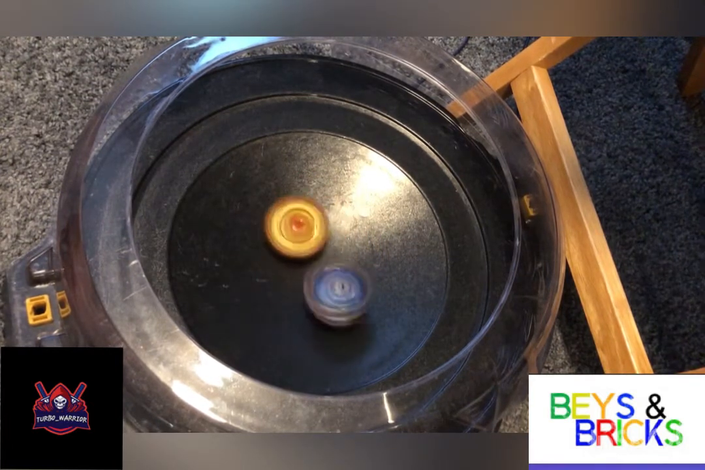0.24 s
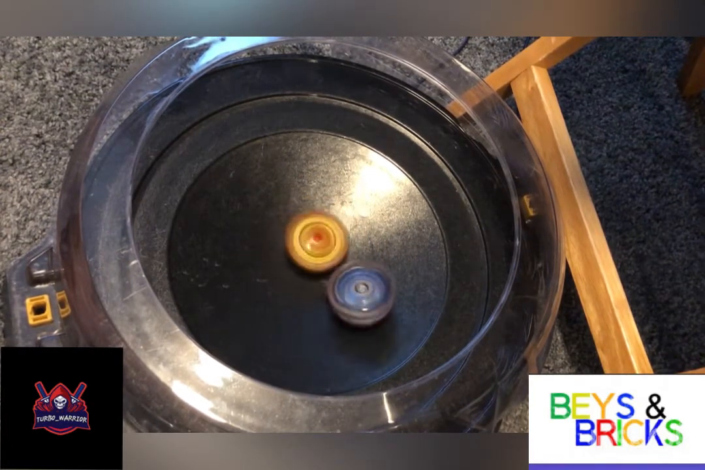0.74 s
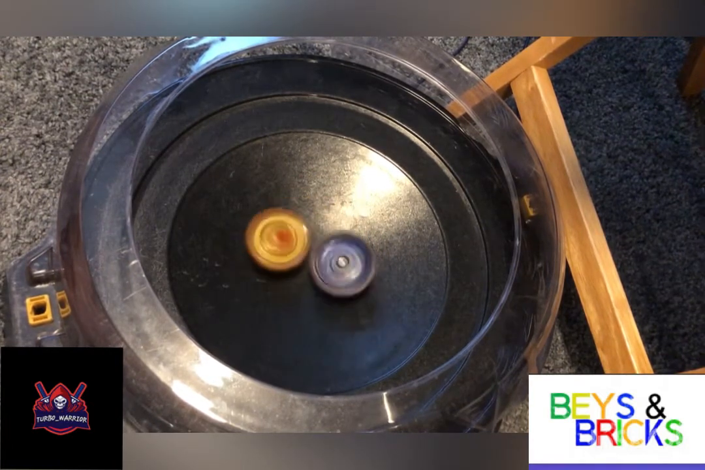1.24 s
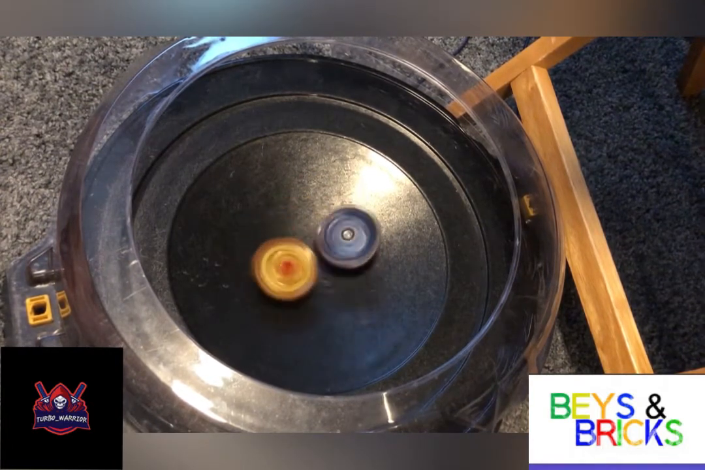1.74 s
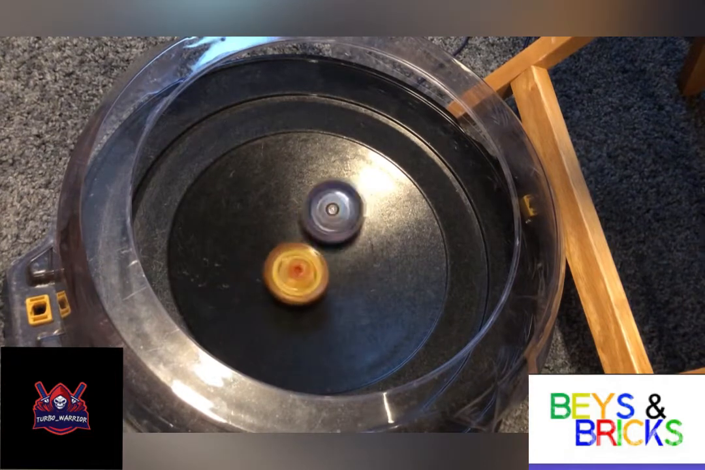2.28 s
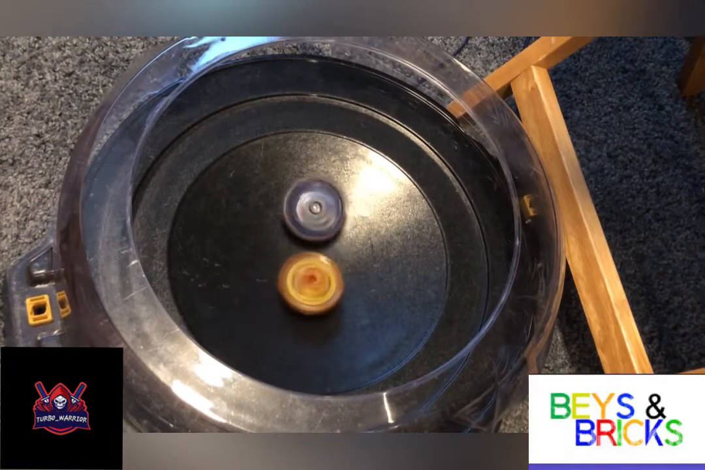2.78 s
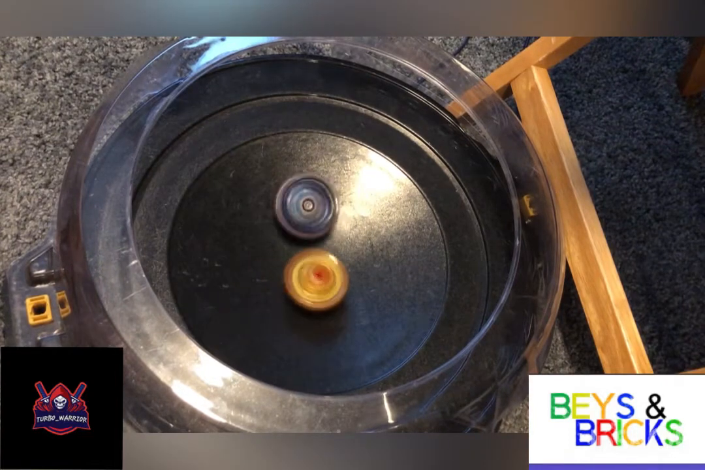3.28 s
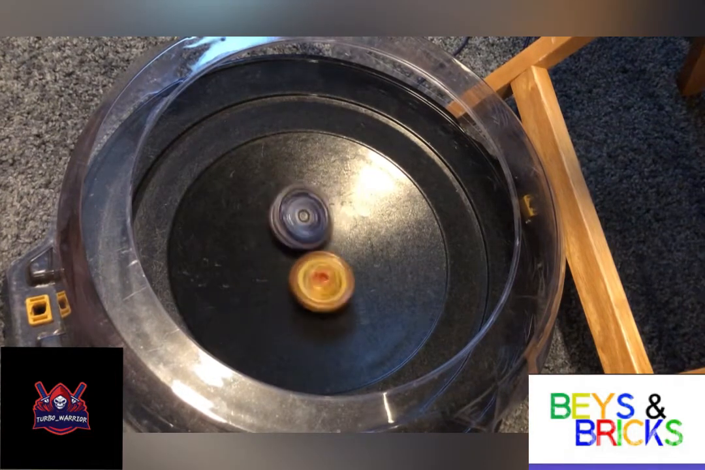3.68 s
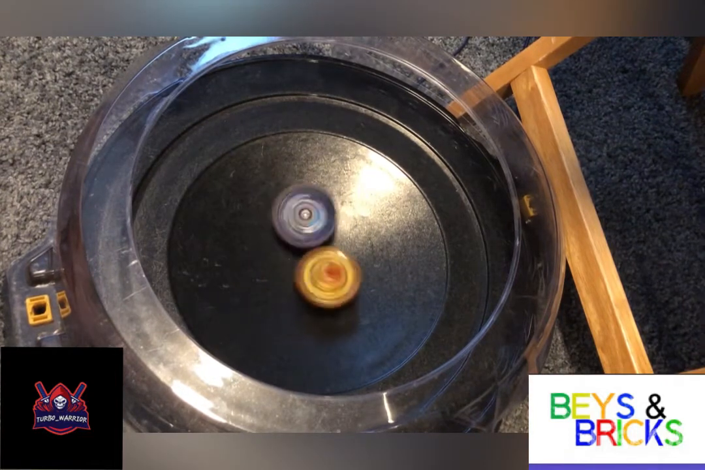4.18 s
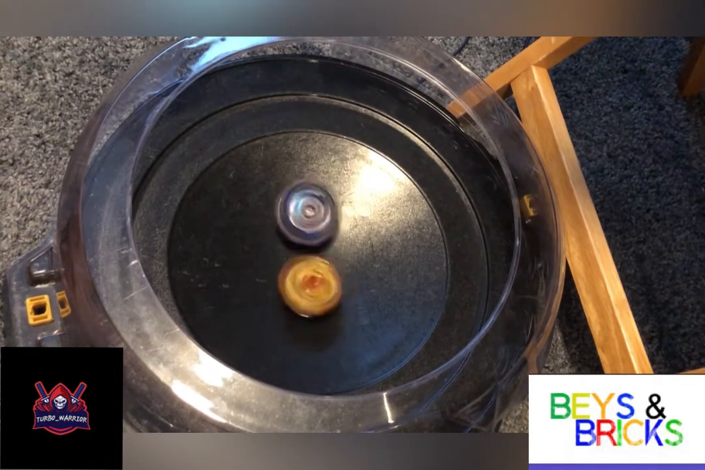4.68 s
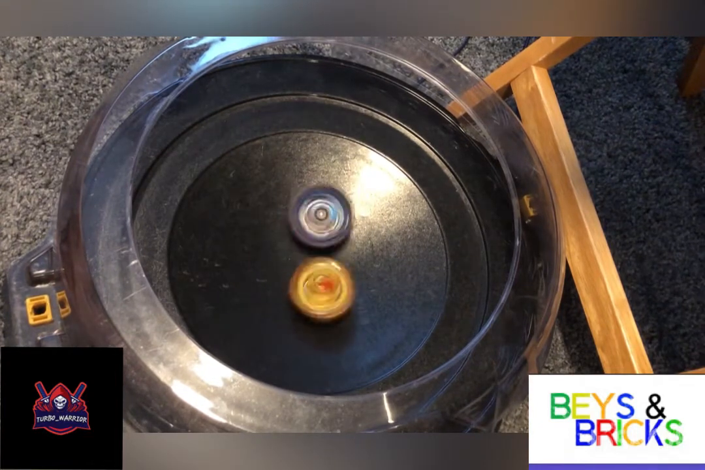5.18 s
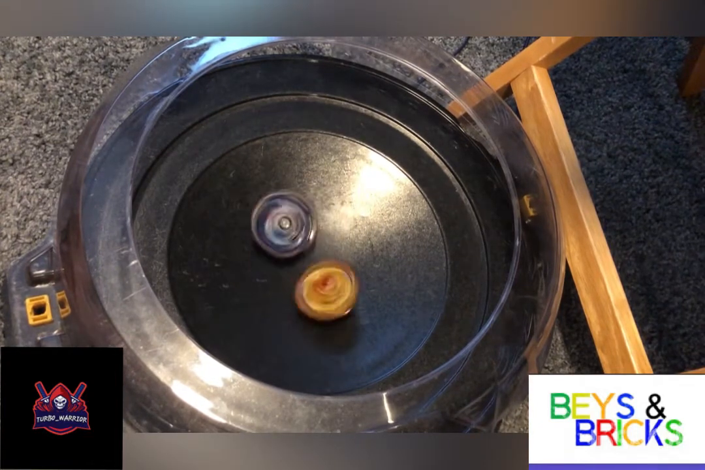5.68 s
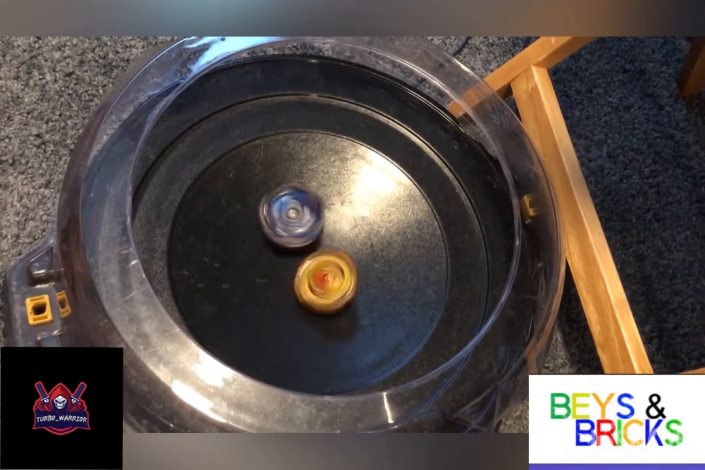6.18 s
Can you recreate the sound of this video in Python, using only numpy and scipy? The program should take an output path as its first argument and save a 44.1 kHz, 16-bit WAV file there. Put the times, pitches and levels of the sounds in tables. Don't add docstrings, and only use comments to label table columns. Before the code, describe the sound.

Close to a small microphone, two toy tops spin in a thin plastic bowl on carpet. Sharp, toothy clacks come irregularly, several a second, with quick faint ticking runs between them early on. Some hits leave a thin metallic ring. Later the knocks grow softer and more hollow, with small scrapes from the tips, over a low faint drumming and grinding.

```python
import sys
import numpy as np
from scipy import signal
from scipy.fft import rfft, irfft
from scipy.io import wavfile
from scipy.ndimage import uniform_filter1d

SR = 44100
rng = np.random.default_rng(int(sys.argv[2]) if len(sys.argv) > 2 else 0)


def persist_wave(psi):
    counts = np.round(np.clip(psi, -1, 1) * 32767).astype(np.int16)
    wavfile.write(sys.argv[1], SR, np.atleast_2d(counts).T)


def voltage_ratio(decibels):
    exponent = np.asarray(decibels, float) / 20
    return 10 ** exponent


N = 283561


def evened(x):
    return x / np.sqrt(np.mean(x ** 2) + 1e-20)


def read(points, hz):
    f, value = np.transpose(points)
    return np.interp(np.log(hz + 1), np.log(f + 1), value)


def add(mix, s, sound):
    part = mix[..., round(s * SR):][..., :sound.shape[-1]]
    part += sound[..., :part.shape[-1]]


def coloured(spectrum):
    gain = voltage_ratio(read(spectrum, np.fft.rfftfreq(N, 1 / SR)))
    return evened(irfft(rfft(rng.standard_normal(N)) * gain, N))


def modes(table, size=8192, order=-1):
    hz, width, db = np.transpose(table)[:, :, None]
    t = np.arange(size) / SR
    sign = order ** np.arange(len(table))[:, None]
    decay = np.sqrt(width) * np.exp(-np.pi * width * t)
    return rfft(sign * voltage_ratio(db) * decay * np.sin(2 * np.pi * hz * t))


def shaken(x, table):
    return evened(signal.oaconvolve(x, irfft(modes(table).sum(0)))[:N])


# t/s, grinding/dB, drumming/dB
TIPS = [(0.0, -54.5, -48.5), (1.16, -60.5, -48), (1.32, -58, -52), (1.48, -68, -50.5), (1.72, -49.5, -47),
        (3.53, -53, -52), (3.94, -62, -50), (4.15, -48, -54), (4.46, -48, -53.5), (4.71, -54, -51.5),
        (5.53, -47, -54.5), (5.71, -49, -46.5), (6.07, -52, -47), (6.43, -47.5, -50)]
# f/Hz, density/dB per Hz
GRIND = [(71, -61), (120, -11.5), (195, -39), (256, 7), (433, 1.5), (632, -5.5), (1300, -8.5), (1770, -23),
         (2780, -19.5), (3160, -33), (4290, -18), (5530, -25), (9000, -29.5), (11700, -42), (19800, -120)]
# f/Hz, width/Hz, level/dB
DRUM = [(47, 17, -59), (64.6, 21, 0), (86, 40, -1.5)]
GRIT_PER_S, GRIT_DB = 420, -6.5


def tips():
    s, grind_db, drum_db = np.transpose(TIPS)
    t = np.arange(N) / SR
    lumps = uniform_filter1d(uniform_filter1d(rng.standard_normal(N), 300), 300)
    lumps_db = 2 * evened(lumps)
    speck_db = 6.5 * np.minimum(rng.exponential(1, N), 2)
    specks = rng.standard_normal(N) * voltage_ratio(speck_db) * (rng.random(N) < GRIT_PER_S / SR)
    grit = shaken(specks, THUMP[2:] + KNOCK)
    grind = coloured(GRIND) * voltage_ratio(lumps_db) + voltage_ratio(GRIT_DB) * grit
    drum = shaken(rng.standard_normal(N), DRUM)
    return grind * voltage_ratio(np.interp(t, s, grind_db) - 1.0) + drum * voltage_ratio(np.interp(t, s, drum_db) + 4.0)


# f/Hz, density/dB per Hz
HISS = [(880, -37), (1500, -4), (1780, -16.5), (2800, -3), (3180, -22.5), (8400, 1), (16000, 5)]


def hiss():
    return voltage_ratio(-78) * coloured(HISS)


def soft_knock_db(db):
    return -0.41 * (db + 41.5)


# first t/s, last t/s
RUNS = [(.0014, .136), (.1815, .1815), (.3614, .406), (.6394, .6866), (.736, .736), (.8394, .8902),
        (.9378, .9892), (1.0405, 1.0914), (1.3588, 1.4633), (1.9596, 2.0755), (2.5338, 2.604),
        (2.5576, 2.6228), (3.121, 3.2825), (3.153, 3.2291), (3.5269, 3.6102)]
# clack level/dB, thump re clack/dB
RUN_DB = [(-39.5, -21), (-43.5, -8), (-37.5, -11), (-42.5, -18), (-46, -26), (-41.5, -6), (-35, -15),
          (-38, -8), (-44.5, -3), (-34, -7), (-47.5, -6), (-32.5, -9.5), (-42.5, -4), (-34, -8),
          (-35.5, -8.5)]


def runs():
    rows = []
    for (first, last), (run_db, thump_db) in zip(RUNS, RUN_DB):
        turn_s = .044 + .009 * first
        for s in np.linspace(first, last, 1 + round((last - first) / turn_s)):
            db = run_db - 1.9 * rng.standard_normal()
            rows.append((s, db, thump_db, soft_knock_db(db), -18, 130 + 170 * s))
    return rows


# t/s, clack level/dB, thump re clack/dB, tick re clack/dB, favoured bowl f/Hz
CLASHES = [(0.2041, -14.5, -9.5, -7.5, 244), (0.4443, -23.5, -2, -7, 250), (0.451, -17, -6.5, -8, 400),
           (0.5738, -14.5, -8.5, -11, 157), (0.7766, -17, -6, -6.5, 327), (1.1314, -16, -4, -8, 269),
           (1.2388, -20, -3.5, -5.5, 372), (1.6578, -21.5, 0, -3.5, 270), (1.7778, -20.5, -2, -5.5, 422),
           (2.135, -17.5, -11.5, -8.5, 300), (2.1853, -20, -6.5, -14.5, 161), (2.421, -19.5, -2, -6.5, 169),
           (2.6709, -20.5, -1.5, -6.5, 230), (2.8658, -19, -1.5, -8, 180), (3.0191, -23.5, -4.5, -6.5, 273),
           (3.3794, -23, -6, -8.5, 170), (3.6703, -23.5, -5.5, -11, 160), (3.9068, -20.5, -7.5, -2.5, 255),
           (4.1764, -20, -6, -13.5, 260), (4.5183, -19.5, -3.5, -4.5, 440), (4.7441, -23, -4.5, -9.5, 428),
           (4.9744, -20, -7.5, -11.5, 413), (5.1077, -22, -3.5, -8.5, 186), (5.2771, -21, -2.5, -6, 467)]


def clashes():
    return [(s, db, thump_db, -8 + 0.69 * s, tick_db, hz) for s, db, thump_db, tick_db, hz in CLASHES]


# t/s, clack level/dB, tick re clack/dB, favoured bowl f/Hz
GLANCES = [(0.5444, -24, -11, 124), (1.2084, -29.5, -7.5, 160), (1.4929, -32.5, -14, 207),
           (1.504, -24, -6.5, 240), (1.5274, -25.5, -5, 249), (2.172, -30, -2.5, 196),
           (2.3642, -24.5, -10.5, 170), (2.6631, -28, -15, 139), (2.9466, -23.5, -8.5, 164),
           (3.0071, -26.5, -5, 250), (3.3072, -24.5, -9.5, 167), (3.332, -29.5, -9.5, 417),
           (3.445, -30, -8.5, 256), (3.455, -26.5, -7.5, 269), (3.7167, -26, -7, 420),
           (4.0923, -25.5, -4.5, 258), (4.1565, -33.5, -12, 275), (4.5067, -29, -11, 256),
           (4.851, -31.5, -14, 296), (4.8653, -25.5, -7.5, 400), (5.449, -25.5, -7.5, 158),
           (5.5152, -32.5, -11, 439), (5.5691, -28, -5, 440), (5.812, -36, -8, 261),
           (5.8723, -35, -9.5, 175), (5.979, -35, -11, 225), (6.097, -30, -9.5, 159),
           (6.3272, -30, -9.5, 387), (6.3823, -35.5, -9, 136)]


def glances():
    return [(s, db, -5 + 0.68 * s, -9.5 + 1.61 * s, tick_db, hz) for s, db, tick_db, hz in GLANCES]


# t/s, clack level/dB, thump re clack/dB,
# favoured bowl f/Hz
GRAZES = [(1.105, -36.5, -1, 266), (1.5704, -54, 4, 374), (2.2876, -39, -2, 468), (2.3082, -31.5, -17, 250),
          (2.79, -41.5, 0, 256), (2.819, -36.5, -12, 310), (3.5763, -41, -3, 264), (3.84, -43, -4, 380),
          (3.9651, -42, -4, 261), (4.0592, -45.5, 5, 263), (4.2185, -36.5, -3.5, 256),
          (4.2386, -47, -9, 250), (4.294, -42.5, -18, 145), (4.3369, -39.5, -5, 441),
          (4.3944, -39.5, 0, 431), (4.451, -39, 2, 417), (1.8987, -46.5, 8.5, 409),
          (4.6637, -44.5, -4, 318), (4.725, -35, -4.5, 200), (5.0928, -43.5, 3, 249),
          (5.2185, -47.5, 2, 398), (5.4086, -37.5, 3, 430), (5.7028, -52, 2, 256), (5.7213, -44.5, -5, 283),
          (5.7912, -47.5, 9, 425), (5.9674, -41.5, 7.5, 352), (6.205, -47.5, 5.5, 260)]


def grazes():
    return [(s, db, thump_db, soft_knock_db(db), -14.5, hz) for s, db, thump_db, hz in GRAZES]


def chatter():
    teeth = rng.standard_normal(5000) * voltage_ratio(4.0 * np.minimum(rng.exponential(1, 5000), 4))
    teeth[150] += 9
    teeth[140:164] += 3.3 * np.hanning(24)
    onset = 1 - np.exp(-np.arange(5000) / SR / 0.0026)
    return teeth * onset


def strike(bank, force, db, ms, favour_db=0, rattle_db=-21):
    t_ms = np.arange(len(force)) / SR * 1000
    rattle = voltage_ratio(rattle_db) * np.exp(-t_ms / 24.6)
    dying = force * (np.exp(-t_ms / ms) + rattle)
    spot = voltage_ratio(2 * rng.standard_normal(len(bank)) + favour_db)
    sound = irfft(rfft(dying, 8192) * (spot @ bank))
    return voltage_ratio(db) * sound / np.linalg.norm(sound) * 15


# f/Hz, width/Hz, level/dB
THUMP = [(120, 34, -15.5), (169, 82, 1), (255, 30.5, 0), (318, 41, -4.5), (421.5, 76, 4), (528, 65, -7)]


def near(hz):
    return -2.5 * np.log2(np.transpose(THUMP)[0] / hz) ** 2


# f/Hz, width/Hz, level/dB
KNOCK = [(712, 156, 6.8), (1011.5, 52, 8.5), (1254, 145, 13.26), (1581, 120, 7.4)]
# f/Hz, width/Hz, level/dB
CLACK = [(1970, 180, -7.5), (2338, 160, -3), (2752, 240, 3), (3645, 660, 2), (4052, 500, -3),
         (4028, 280, 5), (4670, 400, 1.5)]
# f/Hz, width/Hz, level/dB
TICK = [(5556, 2340, -4), (6920, 1200, -0.5), (8320, 630, -3), (9600, 580, -5), (10720, 3300, -6.5),
        (12930, 1000, -7), (13900, 2200, -9)]


def blows():
    out = np.zeros(N)
    thump, knock, clack, tick = modes(THUMP, order=1), modes(KNOCK), modes(CLACK), modes(TICK)
    high_shell = np.transpose(CLACK)[0] > 2950
    for s, db, thump_db, knock_db, tick_db, hz in runs() + clashes() + glances() + grazes():
        force = chatter()
        soft = db < -30 and tick_db < -13
        short = .75 if soft else 1
        bowl = strike(thump, force, db + thump_db + 3.5, 1.37, near(hz), rattle_db=-12.5)
        bowl += strike(knock, force, db + knock_db - 3.5, 15.7)
        dull_db = (0.46 * min(tick_db - 2.0, 0) - 3 * soft) * high_shell
        tops = strike(clack, force, db - 7.0, 7.1 * short, dull_db)
        tops += strike(tick, force, db + tick_db - 2.0, 9.2 * short)
        add(out, max(s - .0025, 0), bowl + tops)
    return out


# f/Hz, t60/s
ROOM = [(100, 0.33), (300, 0.1), (1800, 0.22), (4800, 0.26), (9000, 0.18), (14000, 0.14)]
# f/Hz, level/dB
WET = [(150, -4.5), (500, -5.5), (2500, -1.5), (6000, -1), (14000, 6)]


def room(x):
    taps, at = np.zeros((3, SR // 2)), np.arange(150, SR // 2 - 20, 20)
    at = at + rng.integers(0, 20, (3, len(at)))
    np.put_along_axis(taps, at, rng.choice([-1., 1.], at.shape), 1)
    hz, t, z = signal.stft(taps, SR, nperseg=256)
    fade_db = read(WET, hz)[:, None] - 60 * t / read(ROOM, hz)[:, None]
    tails = signal.istft(z * voltage_ratio(fade_db), SR, nperseg=256)[1]
    phase = 1.7 * np.arange(N) / SR + np.arange(3)[:, None] / 3
    turn = np.cos(2 * np.pi * phase) * np.sqrt(2 / 3)
    return signal.fftconvolve(x * turn, tails / 12.74, axes=1)[:, :N].sum(0)


DISC_HZ = [4350, 4480, 5430, 5940, 6620, 8490, 9740, 10540, 10985, 12025, 12250]
DISC_T60 = [.27, 1.15, .45, .57, .25, .11, .26, .35, .21, .27, .21]
# t/s, level/dB
RINGS = [
    [(4.975, -62)],
    [(.777, -53), (1.239, -52), (1.505, -65), (2.865, -48), (3.008, -65), (4.175, -57.5), (4.518, -48.5),
     (4.744, -64), (3.717, -60)],
    [(5.108, -54)],
    [(.777, -54)],
    [(1.505, -47), (2.673, -50), (3.38, -45), (3.907, -46), (5.571, -54), (6.097, -53)],
    [(1.239, -25), (2.421, -26.5)],
    [(4.175, -49), (4.976, -50)],
    [(.574, -55), (4.175, -54), (4.518, -43)],
    [(.777, -40)],
    [(2.673, -54), (4.518, -58), (4.976, -54)],
    [(3.907, -51)],
]


def discs():
    out, t = np.zeros(N), np.arange(SR // 2) / SR
    for hz, t60, rings in zip(DISC_HZ, DISC_T60, RINGS):
        for s, db in rings:
            flutter = 1 + 0.4 * np.sin(2 * np.pi * (38 * t + rng.random()))
            add(out, s, voltage_ratio(db - 60 * t / t60) * flutter * np.sin(2 * np.pi * hz * (t + s)))
    return out


# t/s, thump level/dB, knock re thump/dB, favoured bowl f/Hz
SKIPS = [(1.037, -52, 5, 152), (1.093, -39.5, -6, 280), (1.266, -38, -10, 122.3), (1.289, -47.5, 7, 132),
         (1.62, -45, -1, 420), (1.884, -45.5, 7.5, 300), (2.028, -39.5, -4, 300), (4.458, -40.5, -2, 431),
         (5.47, -27, -16, 245), (5.626, -40.5, -3, 164), (5.719, -44, 1, 240), (5.761, -35.5, -23, 447),
         (5.785, -30, -20, 400), (5.828, -44, 1, 250), (5.884, -33.5, -6, 194), (6.117, -40.5, -1, 149),
         (6.294, -38.5, -2.5, 409), (6.349, -33.5, -4, 417), (6.4, -33, -4, 148)]


def skips():
    out = np.zeros(N)
    thump, knock = modes(THUMP, order=1), modes(KNOCK)
    for s, db, knock_db, hz in SKIPS:
        force = chatter()
        low = strike(thump, force, db + 2.5, 2.2, near(hz))
        high = strike(knock, force, db + knock_db - 0.5, 6)
        add(out, s - .003, low + high)
    return out


def contacts():
    return signal.lfilter(*signal.butter(2, 106.5, "high", fs=SR), blows() + skips())


def scene():
    knocks = contacts()
    return (knocks + room(knocks) + discs() + tips() + hiss())[None]


def low_pass(x):
    return signal.sosfilt(signal.butter(12, 16830, fs=SR, output="sos"), x)


def record(dry):
    edge = signal.firwin(255, 15900, window=("kaiser", 4), fs=SR)
    return low_pass(signal.oaconvolve(dry, edge[None], "same"))


dry = scene()
out = record(dry)
persist_wave(out)
```